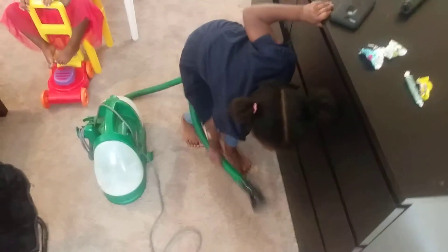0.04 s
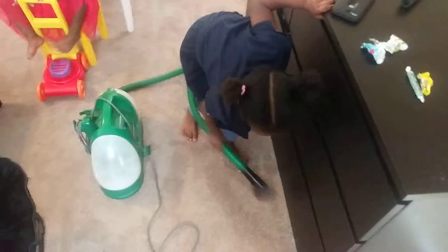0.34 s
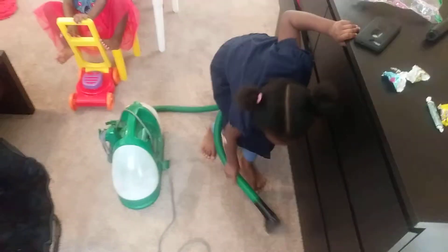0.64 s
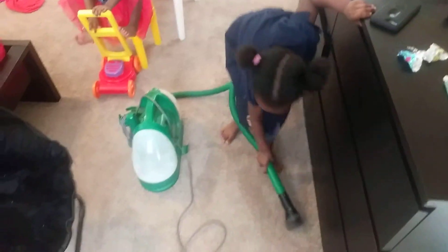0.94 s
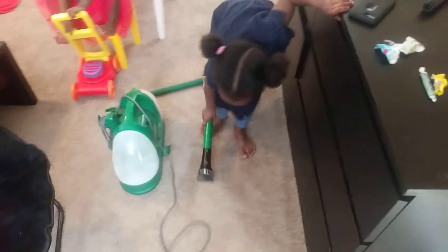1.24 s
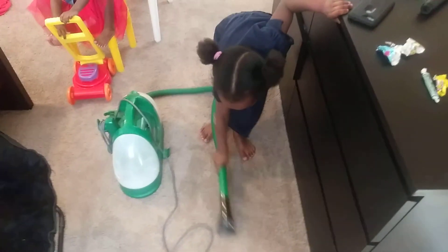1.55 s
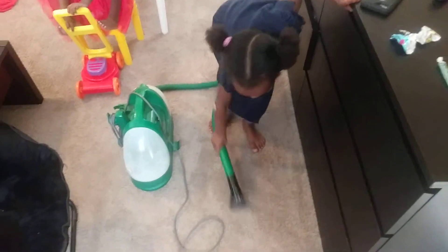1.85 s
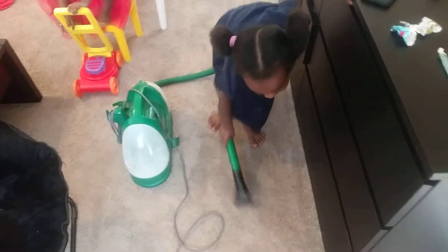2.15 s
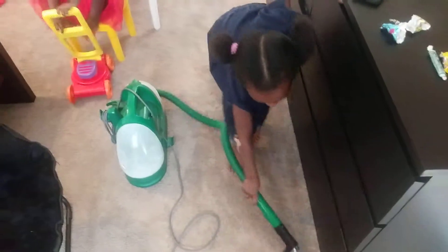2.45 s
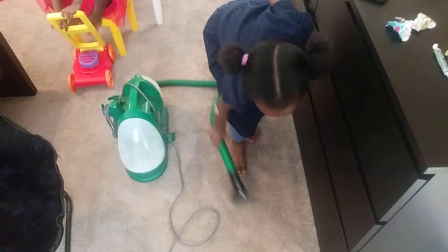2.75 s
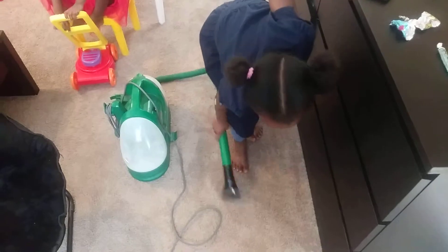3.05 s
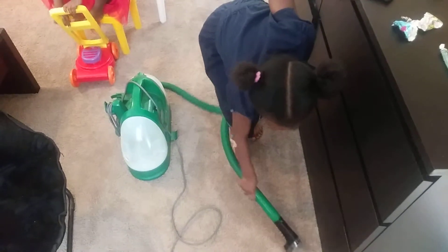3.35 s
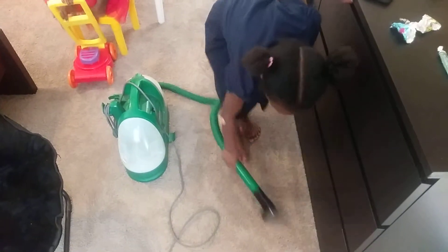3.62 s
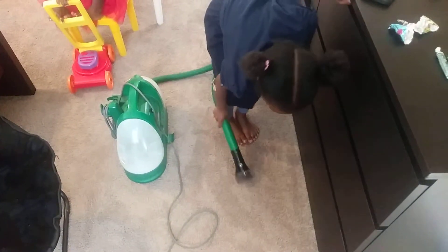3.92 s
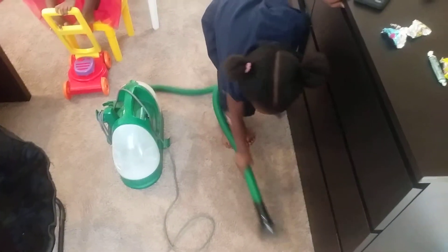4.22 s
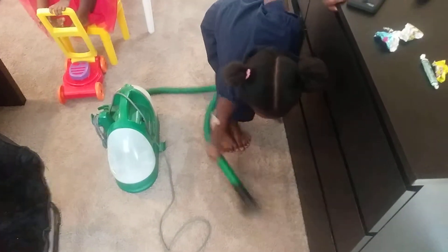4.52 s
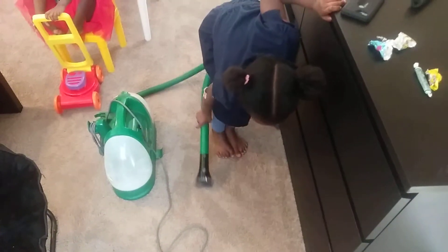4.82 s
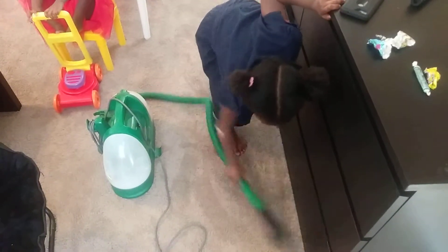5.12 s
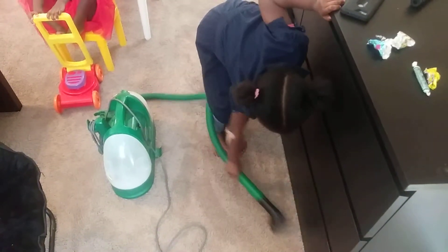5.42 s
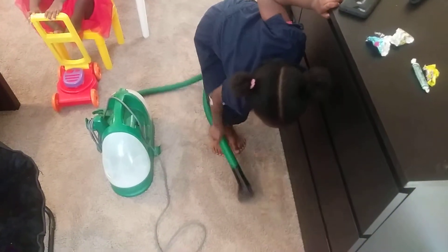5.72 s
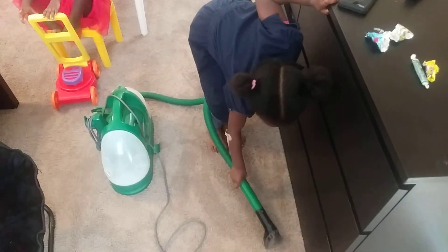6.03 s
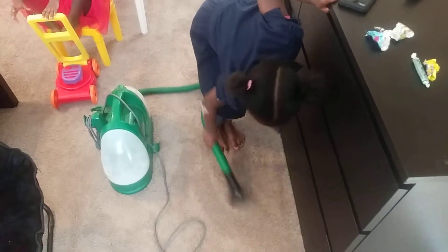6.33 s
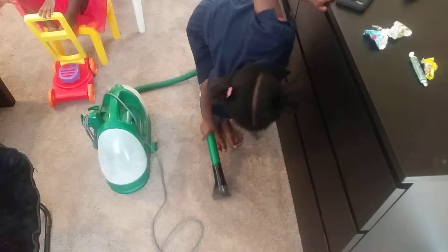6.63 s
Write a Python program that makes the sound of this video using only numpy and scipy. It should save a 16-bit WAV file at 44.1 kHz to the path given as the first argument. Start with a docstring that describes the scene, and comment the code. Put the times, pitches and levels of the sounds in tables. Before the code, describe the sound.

Air rushes without a break through a small vacuum cleaner close by in a carpeted room, over a humming motor and a faint high whine. Early on, the plastic nozzle bumps a wooden cabinet. The suction goes on, with small changes in hiss and a soft hollow note from the hose, until a second, sharper knock with a short thud comes late. The machine keeps running to the end.

```python
"""A steady roar of air with a motor hum and fan whine: a small canister vacuum cleaner on a living room carpet.
Turbulence rushes through the resonant housing, and the hose sounds breathy notes.
Motor speed and hiss shift as the nozzle is pushed about.
Twice the plastic nozzle knocks against a wooden cabinet; both ring briefly in the room."""
import sys
import numpy as np
from scipy import signal
from scipy.fft import rfft, irfft
from scipy.io import wavfile

SR = 44100
rng = np.random.default_rng(int(sys.argv[2]) if len(sys.argv) > 2 else 0)


def materialize(psi):
    """Save the field psi as 16-bit PCM at rate SR to the path in sys.argv[1].

    A 1-D psi becomes a single channel; in a 2-D psi each row is a channel.
    """
    bounded = np.clip(np.atleast_2d(psi).T, -1, 1)
    quanta = np.round(bounded * 32767).astype(np.int16)
    wavfile.write(sys.argv[1], SR, quanta)


N = 294147
TIME_S = np.arange(N) / SR
BIN_HZ = np.maximum(np.arange(N // 2 + 1) * SR / N, 1)


def from_db(db):
    """Decibels to gain."""
    return 10 ** (np.asarray(db) / 20)


def curve(points):
    """Interpolate (time_s, value) points at every sample."""
    return np.interp(TIME_S, *np.transpose(points))


def swell(middle_s, length_s):
    """Smooth bump of height 1, length_s wide at half height."""
    return np.cos(np.pi / 2 * np.clip((TIME_S - middle_s) / length_s, -1, 1)) ** 2


def noise(bin_gain):
    """Spectrally shaped noise, rms 1."""
    shaped = irfft(rfft(rng.standard_normal(N)) * bin_gain, N)
    return shaped / np.sqrt(np.mean(shaped ** 2) + 1e-20)


def drift(rate_hz):
    """Slow random motion, rms 1."""
    return noise(1 / (1 + (BIN_HZ / rate_hz) ** 2))


def lowpass(x, cutoff_hz):
    """One-pole low-pass."""
    pole = np.exp(-2 * np.pi * cutoff_hz / SR)
    return signal.lfilter([1 - pole], [1, -pole], x + 1e-18)


def standing_waves(depth_db, spacing_hz):
    """Fine static spectral ripple from many reflections, in dB; weaker in the bass."""
    knots_hz = np.arange(0, SR / 2, spacing_hz)
    heights = rng.standard_normal(SR // 2)[:len(knots_hz)]
    return depth_db * np.interp(BIN_HZ, knots_hz, heights) * BIN_HZ / (BIN_HZ + 500)


def air_roar(level_db, flutter_db, wander_db, hiss_hz):
    """Turbulence through resonances; each octave flutters, and nozzle sweeps open or choke the hiss."""
    # nozzle sweeps over the carpet: middle_s, length_s, hiss_change_db
    sweeps = [(.33, .4, 2.5), (.87, 0.12, 2.2), (2.15, .3, 2), (2.45, 0.26, 0), (3.31, 0.5, -1),
              (4.05, .3, -.8), (4.55, 0.4, 1), (5.967, 0.3, 2)]
    # rushing air: frequency_hz, relative_density_db
    spectrum = [(40, -64), (90, -50), (150, -39), (260, -22.5), (480, -23.5), (1000, -4.5), (1400, -4.0),
                (1900, 0.0), (3100, -2.5), (3650, -12.5), (5300, -11), (7500, -23), (10800, -36.5),
                (15600, -40)]
    # housing, hose and room: centre_hz, width_hz, lift_db
    resonances = [(202.6, 21, 13), (270, 10, 9), (306, 19, 7), (351, 23, 8), (416, 98.4, 18),
                  (541.4, 84, 13), (657.5, 53, 11.5), (767, 40, 7.5), (849, 10.3, 8.5), (943, 15, 5),
                  (1099, 3.8, 9), (1246, 13, 9.5), (1279, 8, 6.5), (1370, 28, 4), (1474, 40, 7.5),
                  (1715, 360, 7.5), (1941, 25.5, 8.5), (2010, 69, 6), (2202, 178, 6), (2270, 29, 4.5),
                  (2410, 100, -1.5), (2477, 82, 3), (2574, 17, 7.5), (3560, 26, -3), (3887, 85, 5.5),
                  (4840, 58, 5), (13406, 1041, 3)]
    hiss_db = sum(db * swell(middle_s, length_s) for middle_s, length_s, db in sweeps)
    points_hz, points_db = np.transpose(spectrum)
    colour_db = np.interp(np.log(BIN_HZ), np.log(points_hz), points_db)
    colour_db += sum(db / (1 + (2 * (BIN_HZ - hz) / width_hz) ** 2) for hz, width_hz, db in resonances)
    colour_db += standing_waves(depth_db=2.14, spacing_hz=15)
    rush = rfft(noise(from_db(colour_db)))
    octave = np.clip(np.log2(BIN_HZ / 250), 0, 6)
    out = np.zeros(N)
    for k in range(7):
        band = irfft(rush * np.maximum(1 - abs(octave - k), 0), N)
        centre_hz = 250 * 2 ** k
        hiss_share = centre_hz ** 2 / (centre_hz ** 2 + hiss_hz ** 2)
        out += band * from_db(hiss_share * hiss_db + flutter_db * drift(25) + wander_db * drift(3.2))
    return from_db(level_db) * out


def motor(speed_jitter, waver_db, wander_db, whine_gain_db, whine_waver_db):
    """Rotor imbalance hums once a turn; fan blades, slots and commutator sing at multiples of it."""
    # rotor speed: time_s, turns_per_s
    speeds = [(0.0, 423.7), (1.2, 424.5), (1.5, 426.2), (1.95, 423.7), (2.25, 425.4), (2.7, 424.1),
              (3.15, 426.4), (3.3, 425.5), (4.8, 426.6), (4.95, 427.9), (5.55, 425.1), (6.0, 427.4),
              (6.67, 424.9)]
    # motor harmonics: tone -> cycles_per_turn
    orders = {"hum": 1, "blades": 7, "slots": 12, "whine": 14, "commutator": 24}
    # fan whine: time_s, relative_level_db
    whine = [(0.0, -43.3), (0.5, -53), (0.7, -33.6), (0.8, -47), (1.1, -34), (1.6, -43), (2.2, -38),
             (2.3, -45), (2.7, -38), (4.2, -39.5), (4.4, -55), (4.9, -43.5), (5.2, -45.5), (5.3, -40),
             (6.2, -45), (6.67, -41.5)]
    # other tones: tone, level_at_mean_speed_db, slope_db_per_hz of rotor speed
    tones = [("hum", -42, -1.1), ("blades", -41.5, 1.6), ("slots", -55, -1.0), ("commutator", -70.3, 1.5)]
    # passing swells: tone, middle_s, length_s, lift_db
    swells = [("hum", .05, 0.38, 3.8), ("hum", 1.52, .6, 3.5), ("slots", 0.78, 0.88, 8.5),
              ("slots", 3.4, 1.1, 9.1), ("blades", 6.06, 0.87, 4.6)]
    speed_hz = curve(speeds)
    angle_rad = 2 * np.pi * np.cumsum(speed_hz * (1 + speed_jitter * drift(7.5))) / SR
    levels_db = {"whine": curve(whine) + whine_gain_db + whine_waver_db * drift(11)}
    for tone, base_db, slope_db_per_hz in tones:
        speed_db = slope_db_per_hz * (speed_hz - speed_hz.mean())
        swell_db = sum(db * swell(s, length_s) for name, s, length_s, db in swells if name == tone)
        random_db = wander_db * drift(2.6) + waver_db * drift(14)
        levels_db[tone] = base_db + speed_db + swell_db + random_db
    return sum(np.sqrt(2) * from_db(db) * np.sin(orders[tone] * angle_rad)
               for tone, db in levels_db.items())


def hose_notes(fade_s):
    """Air blowing through the tube sounds breathy resonances that fade in and out."""
    # hollow notes of hose and nozzle: start_s, end_s, pitch_hz, width_hz, level_db
    notes = [(-.05, .56, 1680, 230, -30), (1.45, 6.8, 620, 10, -46.5), (2.98, 3.6, 635, 15, -44)]
    out = np.zeros(N)
    for start_s, end_s, pitch_hz, width_hz, level_db in notes:
        envelope = np.clip(np.minimum(TIME_S - start_s, end_s - TIME_S) / fade_s, 0, 1)
        detune = (BIN_HZ - pitch_hz ** 2 / BIN_HZ) / width_hz
        out += from_db(level_db) * envelope * noise(1 / (1 + detune ** 2))
    return out


def ring(force, modes):
    """Decaying modes driven by a force, with alternating signs."""
    out = np.zeros(N)
    for k, (pitch_hz, gain_db, t60_s) in enumerate(modes):
        radius = np.exp(-np.log(1000) / (t60_s * SR))
        feedback = [1, -2 * radius * np.cos(2 * np.pi * pitch_hz / SR), radius ** 2]
        out += (-1) ** k * from_db(gain_db) * signal.lfilter([.5, 0, -.5], feedback, force + 1e-18)
    return out


def knocks(nozzle_db, cabinet_db, scuff_gain, scuff_decay_s):
    """Contact and scuff ring the nozzle; contact alone rings the panel; a hard one adds a deep thump."""
    # nozzle on cabinet: start_s, strength_db, brightness_hz, thud_db
    blows = [(.4735, 3, 2700, -7), (.4766, -2, 3000, -13), (5.2222, 2.5, 8500, 0), (5.2503, -6, 2400, -16)]
    # nozzle and tube: pitch_hz, gain_db, t60_s
    nozzle_modes = [(1324, -18, 0.021), (1720, -12, 0.012), (1930, -12.5, 0.017), (2190, -12.5, 0.019),
                    (2640, -14.5, 0.016), (2920, -14, 0.019), (3350, -18, 0.01), (4880, -15, 0.0065),
                    (5150, -14, 0.0091), (6340, -9.5, 0.0049), (7360, -16, 0.0046), (7970, -15, 0.0048),
                    (8670, -18, 0.0036), (10500, -22, .004)]
    # cabinet panel: pitch_hz, gain_db, t60_s
    panel_modes = [(185, -39, 0.11), (257, -34, 0.12), (314, -35.5, 0.12), (405.4, -28, 0.2),
                   (454, -27.5, 0.097), (664, -24, 0.032)]
    # short 60 Hz thump under the hardest knock: pitch_hz, gain_db, t60_s
    deep_thump_modes = [(60, -43, 0.035)]
    on_nozzle, on_panel = np.zeros(N), np.zeros(N)
    for start_s, strength_db, brightness_hz, thud_db in blows:
        age_s = (np.arange(N) - round(start_s * SR)) / SR
        contact = 1. * (age_s == 0)
        scuff_envelope = (age_s > 0) * np.exp(-np.minimum(abs(age_s) / scuff_decay_s, 40))
        force = contact + scuff_gain * scuff_envelope * rng.standard_normal(N)
        on_nozzle += from_db(strength_db) * lowpass(lowpass(force, brightness_hz), brightness_hz)
        on_panel += from_db(thud_db) * contact
    thud = ring(on_panel ** 2, deep_thump_modes) - ring(on_panel, panel_modes)
    return from_db(nozzle_db) * ring(on_nozzle, nozzle_modes) + from_db(cabinet_db) * thud


def room(x, wet_db, damping_hz, t60_s):
    """Direct sound plus a diffuse tail without deep bass, dulled by carpet and furniture."""
    age_s = TIME_S[:SR // 2]
    envelope = np.exp(-np.log(1000) * age_s / t60_s) * (age_s > .003)
    tail = lowpass(rng.standard_normal(len(age_s)), damping_hz) * envelope
    tail = signal.sosfilt(signal.butter(2, 170, "high", fs=SR, output="sos"), tail)
    tail /= np.sqrt(np.sum(tail ** 2))
    return x + from_db(wet_db) * signal.fftconvolve(x, tail)[:N]


def scene():
    """Running cleaner plus reverberant knocks, mono."""
    roar = air_roar(level_db=-22, flutter_db=0.32, wander_db=0.38, hiss_hz=6340)
    tones = motor(speed_jitter=0.00019, waver_db=2.0, wander_db=1.03,
                  whine_gain_db=0.3, whine_waver_db=1.36)
    hose = hose_notes(fade_s=.1)
    bumps = knocks(nozzle_db=3.5, cabinet_db=2.0, scuff_gain=0.029, scuff_decay_s=0.0042)
    return (roar + tones + hose + room(bumps, wet_db=-8, damping_hz=4500, t60_s=.3))[None]


def record(dry):
    """Soft peak limit, then a steep low-pass."""
    ceiling, cutoff_hz = .68, 15750
    rounded = dry / (1 + (dry / ceiling) ** 8) ** (1 / 8)
    return signal.sosfilt(signal.ellip(12, .1, 80, cutoff_hz, fs=SR, output="sos"), rounded)


dry = scene()
out = record(dry)
materialize(out)
```